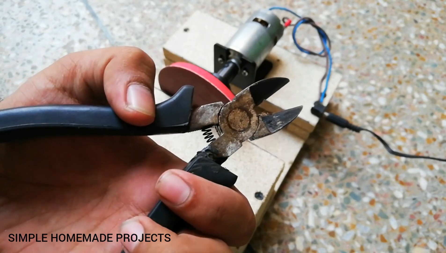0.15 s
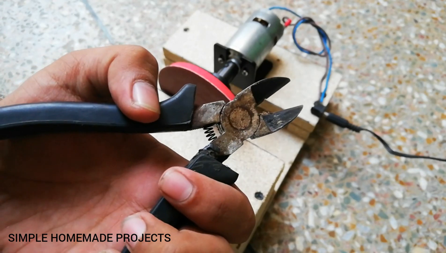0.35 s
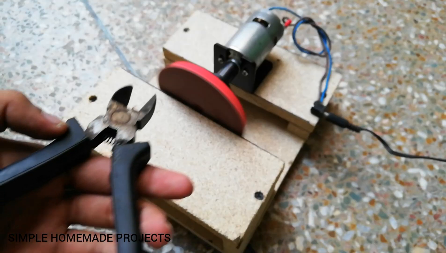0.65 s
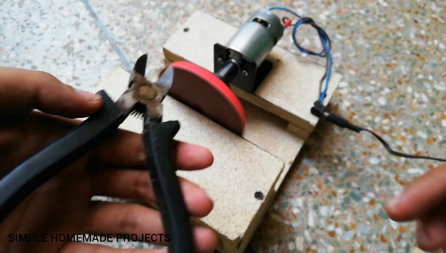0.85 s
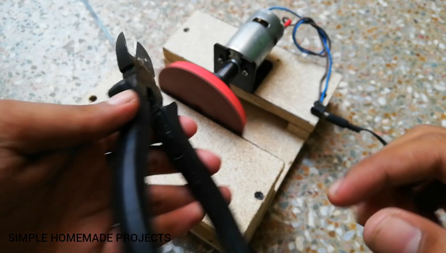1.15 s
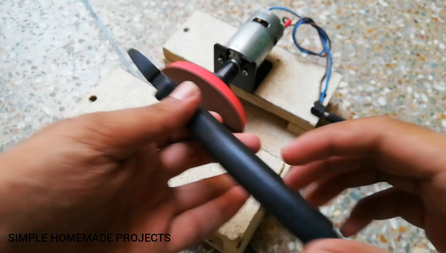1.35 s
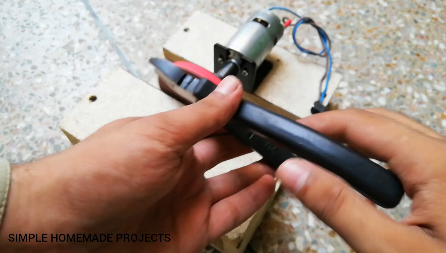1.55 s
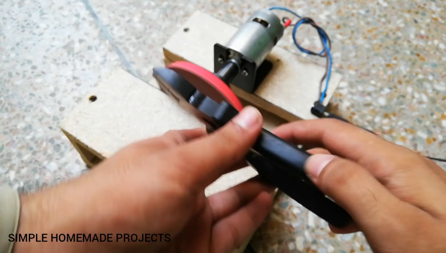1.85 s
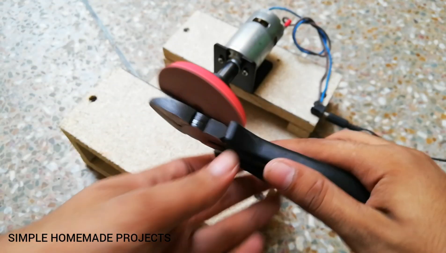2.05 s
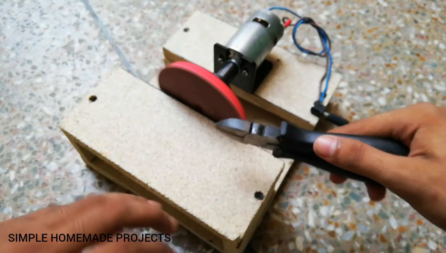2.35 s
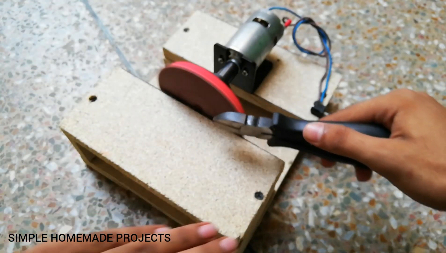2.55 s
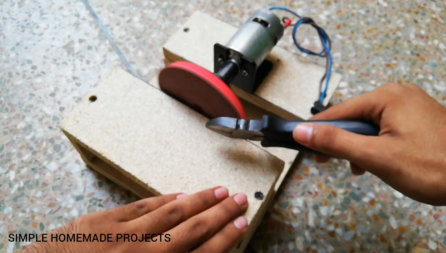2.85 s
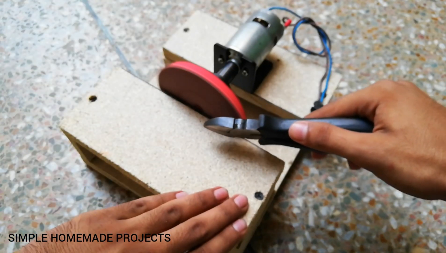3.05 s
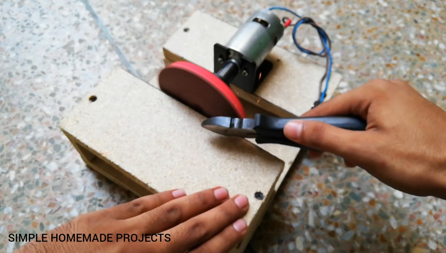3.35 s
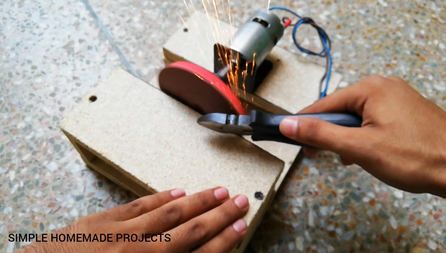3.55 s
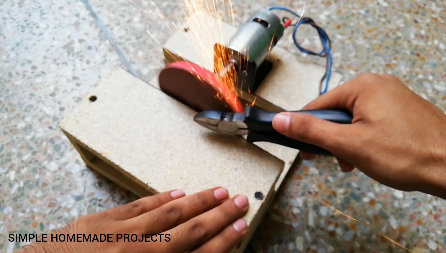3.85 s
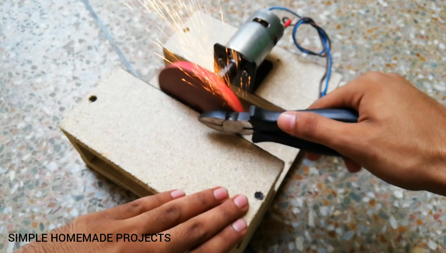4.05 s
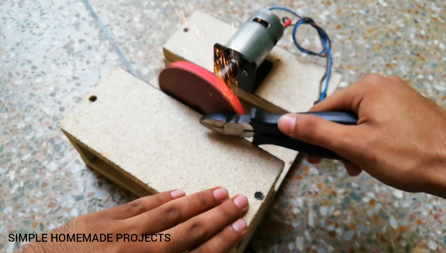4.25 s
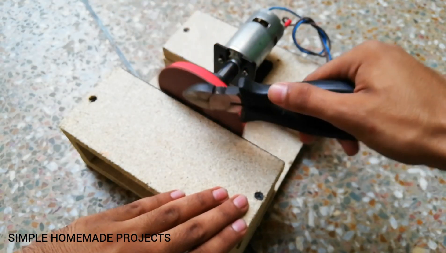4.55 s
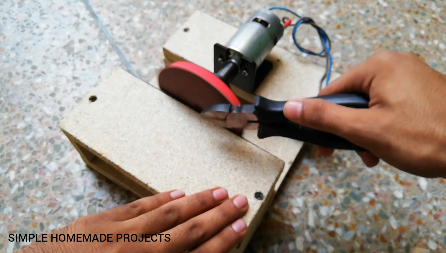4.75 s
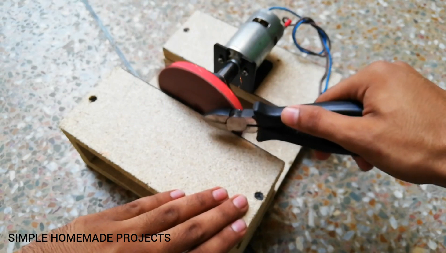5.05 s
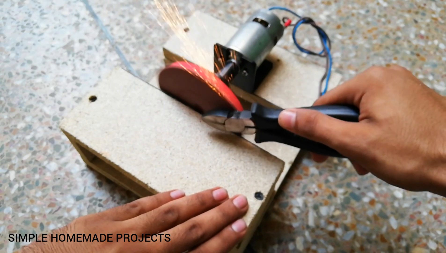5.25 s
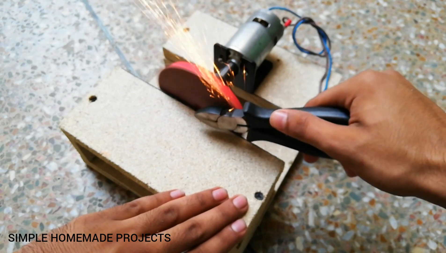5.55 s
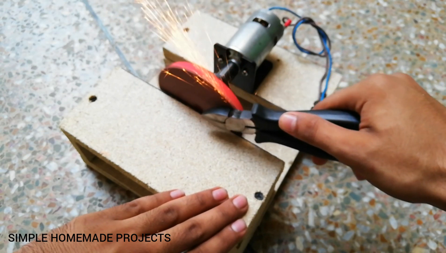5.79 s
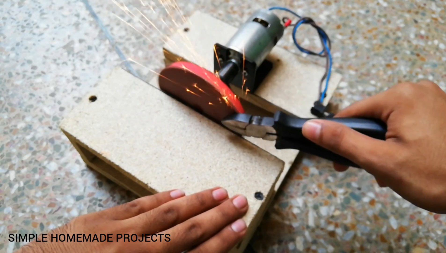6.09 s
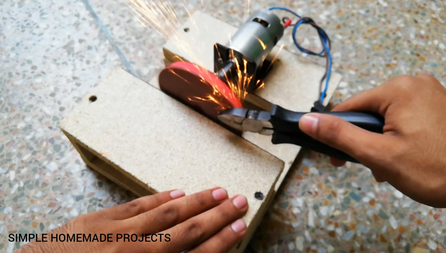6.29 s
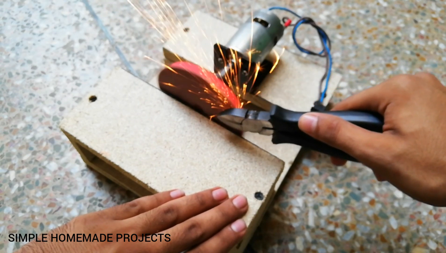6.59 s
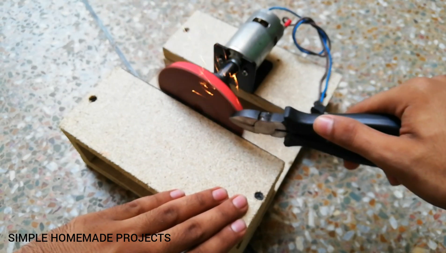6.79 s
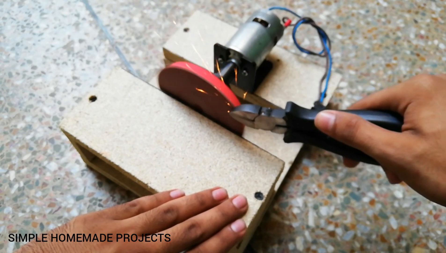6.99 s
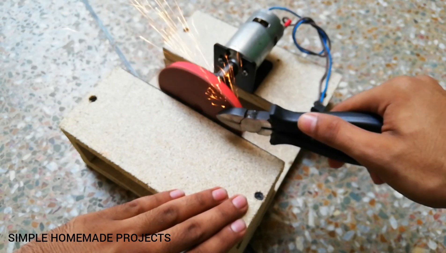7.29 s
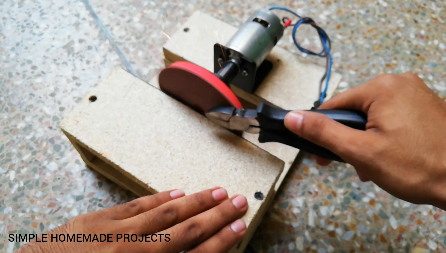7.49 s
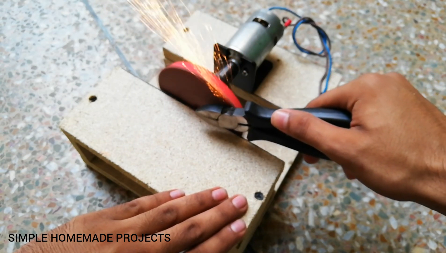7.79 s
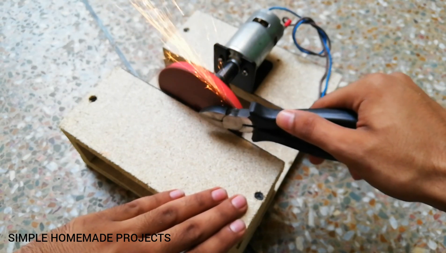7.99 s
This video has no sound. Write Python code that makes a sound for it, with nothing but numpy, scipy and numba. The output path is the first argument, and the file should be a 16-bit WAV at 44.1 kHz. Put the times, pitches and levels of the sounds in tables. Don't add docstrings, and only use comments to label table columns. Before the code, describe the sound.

A small motor on a wooden base runs up to a steady buzzing whine with a fluttering rattle and airy brush hiss. Near three seconds steel pliers touch its sanding disc: harsh gritty scraping and thin high squeals begin, the pitch sags, and it jams momentarily around four seconds. Grinding continues in uneven strokes at lower pitch until another jam near eight. Close stereo microphone, small hard tiled room, faint low rumble.

```python
import sys
import numpy as np
from scipy import signal
from scipy.fft import rfft, irfft, next_fast_len
from scipy.io import wavfile
from scipy.ndimage import uniform_filter1d
from numba import njit

SR = 44100
rng = np.random.default_rng(int(sys.argv[2]) if len(sys.argv) > 2 else 0)


def store_wav(level_fs):
    pcm = np.round(np.clip(np.atleast_2d(level_fs), -1, 1) * 32767)
    wavfile.write(sys.argv[1], SR, pcm.T.astype(np.int16))


def natural_amplitude(level_db):
    exponent = np.asarray(level_db, float) / 20
    return 10 ** exponent


N = 358533
T = np.arange(N) / SR
SIZE = next_fast_len(N)
FREQ = np.fft.rfftfreq(SIZE, 1 / SR) + 1
FREE_HZ = 168.16


def on_log(table, hz):
    f, v = np.transpose(table)
    return np.interp(np.log(hz), np.log(np.maximum(f, 1)), v)


def curves(table):
    s, *columns = np.transpose(table)
    return [np.interp(T, s, c) for c in columns]


def bumps(events):
    return sum(db * np.clip(1 - np.abs(T - s) / half, 0, 1) for s, half, db in events)


def unit(x):
    return x / np.sqrt(np.mean(x ** 2))


def even(x, span_s=0.42):
    span = int(span_s * SR)
    power = uniform_filter1d(uniform_filter1d(x ** 2, span), span)
    return x / np.sqrt(power + 1e-12)


def colour(x, table):
    return unit(irfft(rfft(x, SIZE) * natural_amplitude(on_log(table, FREQ)), SIZE)[:N])


def walk(rate):
    place = np.arange(N) * rate / SR
    count = int(place[-1]) + 2
    return 1.61 * np.interp(place, np.arange(count), rng.standard_normal(count))


@njit
def sweep(x, hz, width):
    y, b, l = np.empty(len(x)), 0., 0.
    for i in range(len(x)):
        g, k = np.tan(np.pi * hz[i] / SR), width / hz[i]
        v = (b + g * (x[i] - l)) / (1 + g * (g + k))
        b, l, y[i] = 2 * v - b, l + 2 * g * v, k * v
    return y


def band(x, hz, width):
    return sweep(x, np.full(N, float(hz)), float(width))


# frequency in Hz, level in dB.
ROOM = [(15, -70), (45, -47), (102, 0.5), (310, 0), (361, -28), (407, -20), (458, 7.5), (667, -38),
        (900, 1), (1170, -24), (1980, -120)]
# time in seconds, level in dB.
ROCKING = [(0, -31), (.25, -26.5), (.65, -28.5), (1.13, -35.5), (1.36, -32), (1.7, -36), (2.85, -29),
           (3.2, -31), (3.87, -34), (4.35, -30), (4.55, -31.5), (5.42, -37), (5.85, -49), (6.03, -44),
           (6.3, -70), (6.47, -43), (6.58, -48), (6.68, -66), (6.88, -68), (7.02, -38), (7.93, -36.5),
           (8.04, -56), (8.12, -41)]


def room_rumble(whine_db, lift_db, contact):
    rocking_db = np.minimum(curves(ROCKING)[0] + 40, 3)
    room_db = -56.5 + 0.27 * (whine_db + 29) + .3 * rocking_db + 0.87 * lift_db
    room = natural_amplitude(room_db) * colour(rng.standard_normal(N), ROOM)
    hand_db = -73 + 12 * contact + 1.9 * walk(4.0)
    hand = colour(rng.standard_normal(N), [(10, -8), (30, -5), (80, 2), (200, -42)])
    return room + natural_amplitude(hand_db) * hand


def partial(turns, k, wander_db):
    angle = 2 * np.pi * (k * turns + rng.random()) + 0.42 * walk(9)
    return natural_amplitude(wander_db * walk(3.85)) * np.sin(angle)


# time in seconds, level in dB of overtones 5 and up below
# the bracket's mode, level in dB of overtones 2 and 3, level in dB of overtone 4.
LOW_LEVELS = [(0, -3.5, -4, -3), (1.0, 4, -2, 0), (1.4, 3.5, -1.5, 2), (2.4, 0, 1.5, 4.5), (2.63, -2, -3, -11),
              (2.85, 1, -5.5, -5), (3.0, -3, -0.5, -3), (3.25, -9, -5, -5), (3.4, 12, -0.5, -2),
              (3.6, 1, -2.5, 5), (3.8, 6, 6.5, -3), (4.12, 4, -7, -21), (4.3, 3, 5, 4), (4.45, 0, 0, -7),
              (4.62, 5, 0, 5), (4.9, 1, 0.5, 1), (5.1, -3, -2, -4), (5.35, -2, 8, 4.5), (5.6, 8, 0, -11),
              (5.8, 5, 9, -12), (6.1, 2, 4, -4), (6.4, 15, 5, 5.5), (6.7, -3, -13, -12), (7.0, 3, -13, 0),
              (7.3, -15, 0, 2), (7.55, -14, -7, 1), (7.75, 5, 2, 5), (8.0, 10, 3, 7)]
# time in seconds, level against the second in dB.
THIRD = [(0, 5), (.5, -2), (1.2, -3), (2.3, -10), (2.6, 3), (3.4, 9), (3.9, -6), (4.2, -12), (4.45, 3),
         (4.6, -2), (5.1, 5), (5.5, -12), (5.9, -9), (6.1, -4), (6.4, -15), (6.7, 4), (7.0, 1), (7.15, 6),
         (7.3, -12), (7.6, -7), (7.9, 0)]


def shaft_hum(hz, turns, gap_hz, shake_db, lift_db, jam):
    _, light_db, heavy_db = curves(LOW_LEVELS)
    levels = curves(ROCKING)
    for db, follow, slope, early, slow_db in (
            (-41, 0.57, 0.18, -0.31, light_db),
            (-38.5, 0.54, 0.32, 0.22, light_db + curves(THIRD)[0]),
            (-41, 0.087, 0.035, 0.58, heavy_db)):
        speed_db = slope * (hz - FREE_HZ) + early * gap_hz
        levels.append(db + follow * (shake_db + 26.5) + speed_db + 4.0 * lift_db + slow_db)
    hum = sum(natural_amplitude(db - 2.0) * partial(turns, k, 1.0) for k, db in enumerate(levels, 1))
    return natural_amplitude(-24 * jam) * hum


def surface(turns, keep):
    steps = 1024
    fresh = rfft(rng.standard_normal((int(turns[-1]) + 2, steps)), axis=1)
    fresh[:, steps // 6:] = 0
    worn = signal.lfilter([1], [1, -min(keep, .98)], irfft(fresh, axis=1), axis=0)
    return even(np.interp(turns * steps, np.arange(worn.size), worn.ravel()))


def high_spot(turns, sharp):
    bump = np.exp(sharp * (np.cos(2 * np.pi * turns) - 1))
    return even(bump + 0.049)


# centre in seconds, half length in seconds, rise in dB.
CAN_SWELLS = [
    (.1, 0.12, 4),
    (.35, 0.24, 8),
    (4.25, .2, -1),
    (4.75, 0.66, 10.5),
    (5.3, .2, 7),
]


def motor_can(brush, grit, hz, free):
    can_db = -15 + 0.1572 * (FREE_HZ - hz) * free + bumps(CAN_SWELLS)
    return natural_amplitude(can_db) * unit(band(brush + grit, 4320, 570))


# start in seconds, end in seconds, frequency in Hz,
# width in Hz, level in dB.
BRUSH_SONG = [
    (-.1, 0.24, 2740, 200, -14),
    (0.23, 0.58, 7000, 300, -8),
    (0.53, 0.84, 7500, 250, -7),
    (0.41, 0.61, 6400, 200, -9),
]
# frequency in Hz, level in dB.
BRUSH = [(3530, -125), (6000, -19), (6900, -4), (7910, -11), (8200, -2), (8550, 4.5), (8850, 4),
         (9290, 4.5), (9700, 2.5), (9950, 4.5), (10600, -4), (11080, -2.5), (11400, -8), (12200, -16),
         (14100, -27), (15600, -66)]
EDGE_S = .07


def brush_hiss(brush, grit, coarse, turns):
    song = 0
    for start, end, mode_hz, width, db in BRUSH_SONG:
        fade = np.clip(np.minimum(T - start, end - T) / EDGE_S, 0, 1)
        song = song + natural_amplitude(db) * fade * even(band(brush + 2.6 * grit, mode_hz, width))
    return colour(brush + 0.58 * coarse * high_spot(turns, 0.89), BRUSH) + song


# start in seconds, end in seconds, first frequency
# in Hz, last frequency in Hz, level against the scrape in dB.
JAW_MODES = [(2.926, 2.99, 10030, 9800, -3), (3.103, 3.323, 10200, 9170, 3), (3.25, 3.33, 10200, 10000, -1),
             (3.368, 3.663, 10280, 9330, 3.5), (3.4, 3.633, 9270, 8700, 2), (3.45, 3.6, 10250, 10250, -5),
             (3.694, 3.86, 10400, 10160, 5), (3.72, 3.84, 11300, 11000, 1), (4.5, 4.86, 8500, 8400, -14),
             (4.726, 5.153, 10350, 10460, -1.5), (4.739, 4.95, 11500, 11430, -17),
             (5.017, 5.152, 8840, 8700, -3), (5.041, 5.14, 9250, 9180, 0), (5.187, 5.448, 9750, 9550, -2),
             (5.406, 5.53, 10500, 10600, 4), (5.464, 5.71, 9300, 9100, 2.5), (5.5, 5.7, 10100, 9700, 3),
             (5.45, 5.662, 11350, 11300, -6), (5.4, 5.6, 7700, 7615, -4), (5.677, 5.974, 10120, 9580, 10.5),
             (5.678, 5.963, 10870, 10480, 5), (5.75, 5.9, 11960, 11760, -7), (5.97, 6.07, 9350, 9870, -1),
             (6.03, 6.197, 10030, 9350, 10.5), (6.007, 6.07, 7600, 7740, 5.5),
             (6.301, 6.513, 9050, 8700, -5), (6.2, 6.451, 9650, 9870, -5), (6.491, 6.72, 9350, 9600, 0),
             (6.626, 6.909, 9730, 9880, 10), (6.55, 6.9, 10600, 11070, -2), (6.55, 6.9, 10900, 11500, -5),
             (6.63, 6.864, 7700, 7800, -2), (7.24, 7.5, 8200, 8180, -11), (7.2, 7.3, 10800, 10750, 4.5),
             (7.519, 7.81, 9540, 9500, -5), (7.54, 7.8, 10380, 10660, 1.5), (7.55, 7.802, 10850, 11150, -9),
             (7.94, 8.02, 10300, 9600, 3), (8.006, 8.095, 11000, 10600, 7.5)]
# start in seconds, end in seconds, first frequency in Hz, last frequency
# in Hz, level against the scrape in dB.
HANDLE_MODES = [(3.0, 3.248, 2850, 2700, -18), (2.989, 3.194, 3750, 3700, -4),
                (3.45, 3.62, 3200, 3040, -12), (6.382, 6.55, 3000, 2870, -9),
                (6.64, 6.79, 2600, 2580, -3.5), (7.05, 7.448, 3564, 3580, -7),
                (7.45, 8.003, 2696, 2600, -11.5), (7.9, 8.02, 3600, 3600, -8)]


def sing(grit):
    out = np.zeros(N)
    for start, end, first_hz, last_hz, db in JAW_MODES + HANDLE_MODES:
        width = 260 * (1. if first_hz > 5000 else 1.8)
        span = slice(int((start - .02) * SR), int((end + .02) * SR))
        t = T[span]
        hz = np.linspace(first_hz, last_hz, len(t))
        tone = sweep(sweep(grit[span], hz, width), hz, 2 * width)
        edge = np.clip(np.minimum(t - t[0], t[-1] - t) / EDGE_S, 0, 1)
        out[span] += natural_amplitude(db) * even(tone, .03) * np.sin(np.pi / 2 * edge) ** 2
    return out


# frequency in Hz, level in dB.
GRIT = [(3530, -13), (6000, -7.5), (7210, -23), (7630, -3), (8270, -2), (9510, 3), (9860, 7.5), (10900, 4),
        (12100, 0), (15100, -8.5), (15600, -14)]


def steel_scrape(coarse, turns, contact, sharp, singing):
    peak = high_spot(turns, 2.5 * np.minimum(sharp, 2.4))
    shoulder = high_spot(turns + .04, .5 * sharp)
    squeal = singing * sing(surface(turns, .96)) * even(peak + 1.4 * shoulder)
    loose = (coarse + .55 * rng.standard_normal(N)) * high_spot(turns, 0.45 * sharp * contact)
    return natural_amplitude(-2.5) * (colour(loose, GRIT) * natural_amplitude(1.3 * walk(30)) + squeal)


# frequency in Hz, level in dB.
IDLE = [(1060, -10), (2200, 1.5), (2750, 0.5), (3400, -1.5), (4300, -4.5), (5000, -5), (6400, -5),
        (7600, -15), (9800, -31)]
# frequency in Hz, level in dB.
MIDDLE = [(1060, -15), (1800, -14), (2300, -12), (2650, 2.5), (3060, -0.5), (5210, -0.5), (6270, -5.5),
          (7500, -4), (9750, -40), (16500, -120)]


def hiss(hz, turns, contact, sharp, singing):
    brush = rng.standard_normal(N) * high_spot(turns, 0.4) * natural_amplitude(2.0 * walk(120))
    grit, coarse = surface(turns, .96), surface(turns, .9)
    free, held = np.sqrt(1 - contact), np.sqrt(contact)
    pattern = signal.sosfilt(signal.butter(2, 4200, fs=SR, output="sos"), grit)
    idle = colour(brush + (0.62 + 0.018 * (FREE_HZ - hz)) * pattern, IDLE)
    broken = coarse + 1.35 * rng.standard_normal(N)
    broken = broken * high_spot(turns, 0.15 * sharp * contact) * natural_amplitude(1.37 * walk(15))
    clean = np.clip(0.011 * (hz - 107.6), 0, 1)
    middle = free * idle + held * colour(broken + 3.0 * clean * pattern, MIDDLE)
    middle = middle + motor_can(brush, grit, hz, free)
    scrape = steel_scrape(coarse, turns, contact, sharp, singing)
    return middle, free * brush_hiss(brush, grit, coarse, turns) + held * scrape


# frequency in Hz, width in Hz, level in dB.
RING = [(844, 17, -8), (1066, 62, 4.5), (1276, 340, -14.5), (1550, 125, -6), (2020, 760, -9.5)]


def ring(x):
    modes = 0
    for k, (hz, width, db) in enumerate(RING):
        modes = modes + (-1) ** k * natural_amplitude(db) * signal.lfilter(*signal.iirpeak(hz, hz / width, SR), x)
    return signal.sosfilt(signal.butter(4, 680, "high", fs=SR, output="sos"), modes)


def jam_shudder(jam):
    shaken = band(band(rng.standard_normal(N), 1080, 105), 1085, 280)
    return jam * natural_amplitude(-2) * unit(shaken)


# frequency in Hz, level in dB.
BASE = [(350, -53), (600, -33), (652, -5), (821, 3.5), (1120, -3), (1260, -0.5), (1330, 2), (1400, -3),
        (2030, 2), (2240, -17), (2540, -15), (4300, -15), (5590, -60), (9460, -120)]
# time in seconds, frequency in Hz.
BRACKET_HZ = [(0, 1104), (3.3, 1102), (3.6, 1063), (3.72, 1060), (3.86, 1087), (4.3, 1095), (4.5, 1050),
              (5.0, 1027), (5.25, 1010), (5.42, 1050), (5.85, 1150), (6.2, 1087), (6.9, 1067), (7.35, 1075),
              (7.7, 1090)]


def radiate(hz):
    hz = hz[::16]
    modes = 0
    # Hz, width Hz, dB
    for centre_hz, width, db in ((curves(BRACKET_HZ)[0][::16], 83, 17.2), (1720, 55, 7.1)):
        modes = modes + natural_amplitude(db) / (1 + (2 * (hz - centre_hz) / width) ** 2)
    return np.repeat(natural_amplitude(on_log(BASE, hz)) * (1 + modes), 16)[:N]


# time in seconds, beat rate in Hz, level against the whine in dB.
RATTLE = [
    (0, 38, -12),
    (.55, 38.4, -4),
    (.7, 38.2, 4),
    (1.0, 40.96, 4),
    (1.5, 40.92, 2.5),
    (2.0, 39.8, -0.5),
    (2.35, 38.7, -1),
    (2.5, 35.54, -16),
    (8.13, 39, -54),
]
ROCK_DB = {5: -17, 6: -15.5, 7: -5.5, 8: -13, 9: -10, 10: 0, 11: -5.5, 12: -3, 13: -8}
# frequency in Hz, level in dB.
CLATTER = [(560, -30), (700, -10), (1000, 10), (1500, 1), (2000, 3), (2400, -49)]


def whine(hz, turns, upper_db, palm, swell_db):
    beat_hz, rock_db = curves(RATTLE)
    beats, rock = 2 * np.pi * np.cumsum(beat_hz) / SR, natural_amplitude(rock_db)
    slow_db, bracket_hz = -7 * palm + curves(LOW_LEVELS)[0], curves(BRACKET_HZ)[0]
    lower, upper = 0, 0
    for k in range(5, 26):
        tone_hz = k * hz
        angle = 2 * np.pi * (k * turns + rng.random()) + 0.012 * k * walk(12)
        drift_db = (1 + .8 * palm) * walk(4)
        damp_db = slow_db * np.clip((930 - tone_hz) / 120, 0, 1)
        away_db = -.7 * swell_db * np.clip(abs(tone_hz - bracket_hz) / 120 - .6, 0, 1)
        tone = radiate(tone_hz) * natural_amplitude(drift_db + damp_db + away_db) * np.sin(angle)
        if k in ROCK_DB:
            jitter = (.25 if k == 7 else .7) * walk(25)
            side = np.sin(angle - beats + 0.813 * k + jitter)
            tone = tone + rock * natural_amplitude(ROCK_DB[k]) * radiate(tone_hz - beat_hz) * side
        high = np.clip((tone_hz - 1350) / 150, 0, 1)
        lower, upper = lower + (1 - high) * tone, upper + high * tone
    knocks = rng.standard_normal(N) * (1 + 0.29 * np.cos(beats))
    clatter = rock * natural_amplitude(-15.0) * colour(knocks, CLATTER)
    return even(lower, 0.3) + natural_amplitude(upper_db) * even(upper, 0.2) + clatter


# time in seconds, shaft speed in Hz.
LOADED = [(2.87, 168.1), (3.21, 157), (3.65, 141.7), (3.88, 138.7), (3.99, 107), (4.36, 127.9),
          (4.55, 134.3), (4.72, 135.6), (5.25, 123.6), (5.64, 118.4), (5.92, 111.6), (6.08, 111.2),
          (6.25, 104.4), (6.52, 99.83), (7.22, 112.3), (7.56, 107.6), (7.94, 109.5), (8.04, 88)]


def shaft_speed():
    gap_hz = 20 * np.exp(-T ** 1.4)
    return np.minimum(FREE_HZ - gap_hz, *curves(LOADED)), gap_hz


# frequency in Hz, left minus right in dB.
PORT_DB = [(30, -7), (110, 0), (200, 2), (380, -3), (700, 7), (1290, 3), (2380, -3), (4400, -5),
           (8120, 2.5), (15000, -2)]
# frequency in Hz, lead of the left in radians.
PORT_RAD = [(0, -1), (260, 0.66), (600, 2), (860, 0.68), (2150, 0.5), (2500, -5), (2760, -4.5), (3190, -4),
            (4050, -4.5), (6720, -1), (7060, -6), (8350, 4), (9300, -1.5), (15300, -1)]
# frequency in Hz, unrelated share from 0 to 1.
APART = [(30, 0.6), (80, 0.86), (150, 0.5), (300, 0.77), (1000, 0.61), (2200, 0.84), (4500, 0.91),
         (9000, 1), (13000, 0.8)]


def ports(shared, other):
    share = np.clip(on_log(APART, FREQ), 0, 1) / np.sqrt(2)
    lean = natural_amplitude(on_log(PORT_DB, FREQ) / 2) * np.exp(.5j * on_log(PORT_RAD, FREQ))
    mid = rfft(shared, SIZE) * np.sqrt(1 - share ** 2)
    side = rfft(other, SIZE) * share
    return irfft(np.array([lean * (mid + side), (mid - side) / lean]), SIZE)[:, :N]


# time in seconds, contact from 0 to 1, sharpness of the high spot, rough share of the
# whine in dB.
CONTACT = [(0, 0, 0.38, -24.5), (2.85, 0.09, 0.23, -15), (2.92, 0.74, 0.71, -19), (3.4, 0.7, 1.3, -4.5),
           (3.9, 0.48, 2.4, -18), (4.0, 1, 2, -26), (4.06, 0.14, 1.4, -1.5), (4.415, 0.02, 0.29, -3),
           (4.425, 0.52, 1.8, -7), (4.47, 0.09, 1.24, -7), (4.525, 0.06, 1.2, -16), (4.535, 0.5, 2.3, -4),
           (4.9, 0.95, 1.7, -10), (5.4, 0.78, 2.1, -3), (5.8, 0.84, 2.9, -4.5), (6.2, 0.82, 2, -1.5),
           (6.7, 0.83, 5, 3), (7.0, 0.81, 2.8, -3.5), (7.5, 0.91, 1.9, -7.5), (7.94, 0.94, 2, 8),
           (8.13, 0.7, 5.6, 4.5)]
# time in seconds, level in dB, share above the bracket's mode in dB.
SHAKE = [(0, -16.5, -9), (.2, -17.5, -6), (.8, -14.5, -8.5), (1.36, -17, -6), (1.7, -16, -5.5),
         (2.3, -16, -4.5), (2.55, -15, -5), (2.9, -16, -4.5), (3.15, -14.5, -13), (3.37, -24.5, -1.5),
         (3.48, -18.5, -6), (3.9, -19, -8), (4.02, -24.5, -9), (4.18, -22.5, -12), (4.68, -24.5, 2.5),
         (5.0, -22, -11.5), (5.7, -32.5, -9), (6.3, -37, -7), (6.93, -41, -17), (7.12, -23.5, -8.5)]
# centre in seconds, half length in seconds, rise in dB.
SWELLS = [(3.2, 0.045, 4), (3.65, 0.068, 9), (3.86, 0.069, 4), (3.92, 0.018, 5.5), (3.945, 0.035, 4),
          (4.41, 0.049, 6.5), (4.5, 0.083, 7.5), (4.97, 0.074, 2), (5.25, 0.074, 3), (5.41, 0.064, 3.5),
          (5.82, 0.082, 2.5), (6.07, 0.16, 8.5), (6.47, 0.061, 10), (6.56, .05, 3), (6.67, .03, 4),
          (6.74, 0.045, 2), (6.83, 0.047, 5), (6.92, 0.043, -2), (7.0, 0.039, 5.5), (7.34, 0.15, 4.5),
          (7.72, 0.06, 11.5), (7.81, 0.078, 6), (7.94, 0.083, 7.5), (8.015, 0.093, 20), (8.08, 0.061, 12)]
# centre in seconds, half length in seconds, change in dB.
STROKES = [(.05, 0.47, 4), (2.96, 0.054, 4), (3.21, 0.069, 0.5), (3.3, .04, 3.5), (3.35, 0.039, 0.5),
           (3.42, 0.082, 5), (3.55, 0.11, 3.5), (3.82, 0.077, 4.5), (3.92, 0.072, 8), (4.12, 0.13, -7.5),
           (4.44, 0.035, 5), (4.66, 0.031, 5), (4.75, 0.4, 2), (5.11, 0.11, 4), (5.3, 0.091, 2),
           (5.46, 0.17, 3.5), (5.65, 0.08, -2), (5.82, 0.054, -1), (5.93, 0.041, -2), (5.98, 0.026, -9),
           (6.08, 0.074, -0.5), (6.45, 0.087, 4.5), (6.68, 0.075, -0.5), (6.84, 0.23, -2.5),
           (6.96, 0.099, 1), (7.6, 0.062, -3), (7.68, 0.15, 0), (7.96, 0.035, 4), (8.04, 0.086, 3)]
# start in seconds, length in seconds.
JAMS = [
    (3.905, 0.13),
    (7.965, 0.097),
]


def scene():
    hz, gap_hz = shaft_speed()
    turns = np.cumsum(hz) / SR
    contact, sharp, rough_db = curves(CONTACT)
    contact = np.clip(contact, 0, 1)
    jam = sum(np.clip(np.minimum(T - s, s + length - T) / 0.063 + .5, 0, 1) for s, length in JAMS)
    lift_db = bumps([(s + length + 0.026, 0.059, -8) for s, length in JAMS])
    shake_db, upper_db = curves(SHAKE)
    shake_db = shake_db - 13.5 * np.clip((T - 7.55) / 0.059 + .5, 0, 1)
    swell_db, stroke_db = bumps(SWELLS), bumps(STROKES)
    whine_db = shake_db + swell_db + lift_db
    middle_db = -32 + 0.14 * (shake_db + 10.5) + 0.14 * swell_db + 0.52 * stroke_db + lift_db
    middle_db = middle_db - 0.22 * (sharp - 1) - 0.28 * jam
    brush_db = -29 + 0.1023 * (hz - FREE_HZ)
    top_db = contact * -26.5 + (1 - contact) * brush_db + stroke_db + 1.13 * lift_db
    pan_db = 8.23 + 3.8 * contact + 3.54 * walk(12)
    rough_db = rough_db - 0.1 * swell_db * (1 - jam)
    hum = shaft_hum(hz, turns, gap_hz, shake_db, lift_db, jam)
    palm = np.clip((T - 3.01) / 0.078, 0, 1)
    steady = whine(hz, turns, upper_db - 0.94 * swell_db, palm, swell_db)
    low, high = [], []
    for clean in (1, 0):
        body = clean * steady + natural_amplitude(rough_db) * even(ring(surface(turns, 0.54)))
        body = natural_amplitude(-20 * jam) * body / np.sqrt(1 + natural_amplitude(rough_db) ** 2) + jam_shudder(jam)
        room = room_rumble(whine_db, lift_db, contact)
        low.append(clean * hum + natural_amplitude(whine_db - 1.0) * body + room)
        middle, top = hiss(hz, turns, contact, sharp, .25 + .95 * clean)
        high.append(natural_amplitude(middle_db) * middle + natural_amplitude(top_db + 1.5) * top)
    lean = natural_amplitude(np.array([pan_db - 3.5, 8.5 - pan_db]) / 2)
    return ports(*low) + lean * ports(*high)


def roll_off(x):
    return signal.sosfilt(signal.butter(12, 15780, fs=SR, output="sos"), x)


def record(dry):
    dry = dry + natural_amplitude(-58) * np.diff(rng.standard_normal(dry.shape), prepend=0)
    rounded = dry / (1 + (dry / .8) ** 8) ** (1 / 8)
    return roll_off(rounded)


dry = scene()
out = record(dry)
store_wav(out)
```